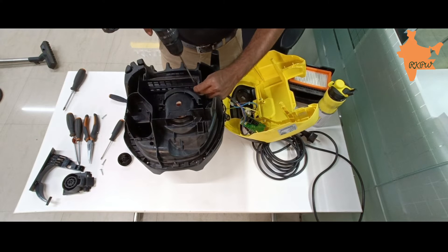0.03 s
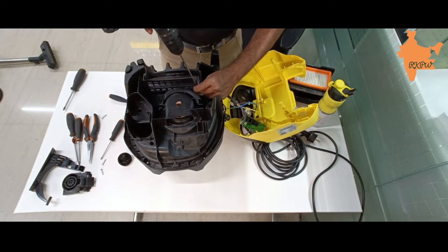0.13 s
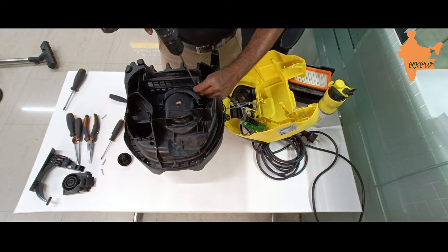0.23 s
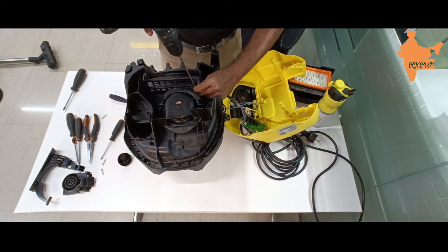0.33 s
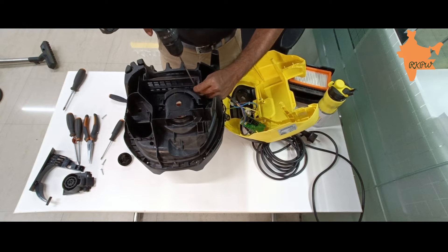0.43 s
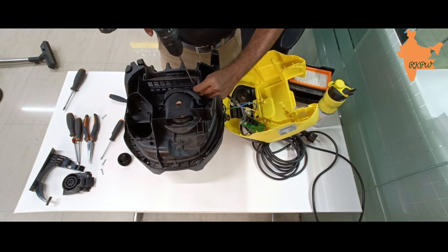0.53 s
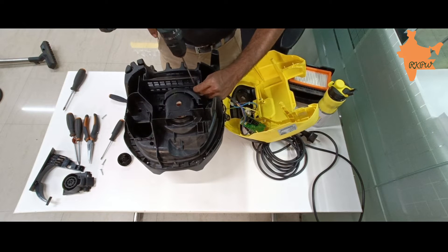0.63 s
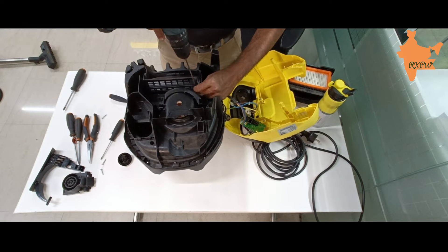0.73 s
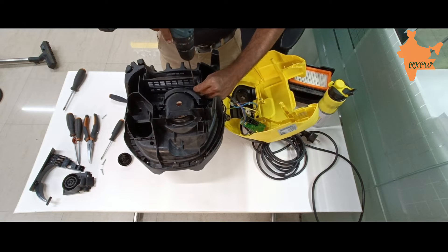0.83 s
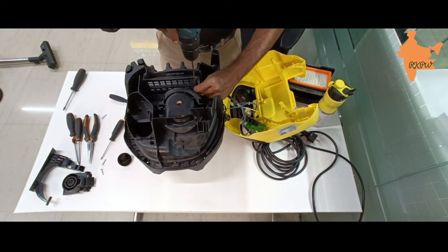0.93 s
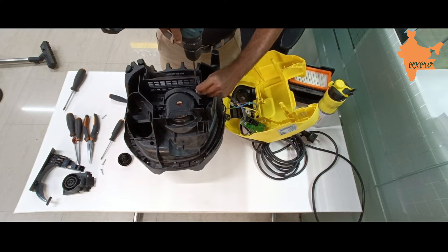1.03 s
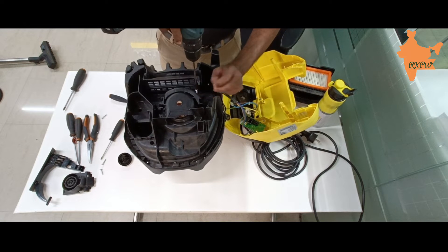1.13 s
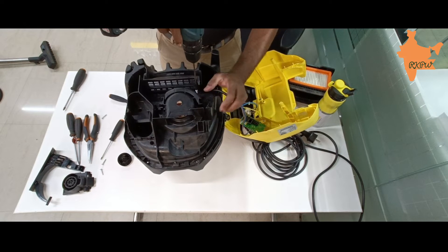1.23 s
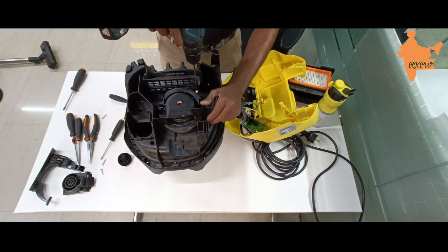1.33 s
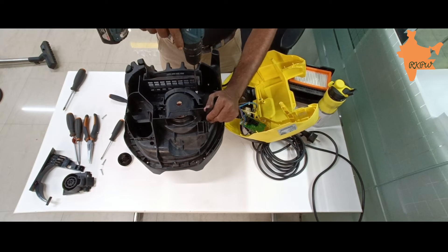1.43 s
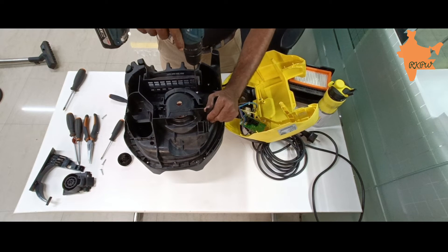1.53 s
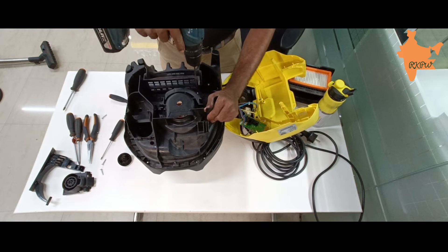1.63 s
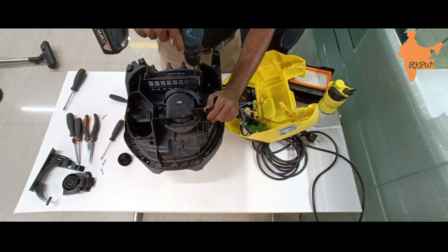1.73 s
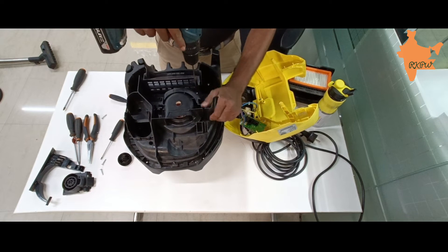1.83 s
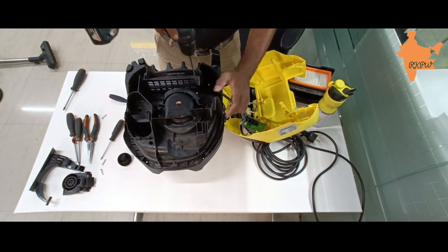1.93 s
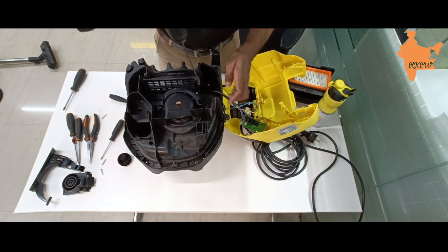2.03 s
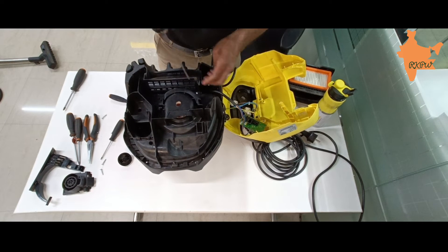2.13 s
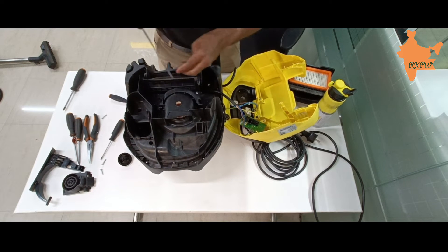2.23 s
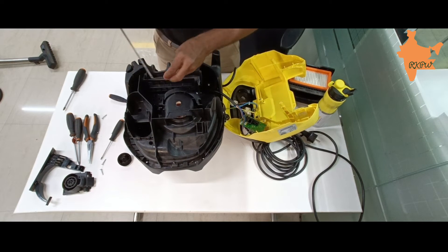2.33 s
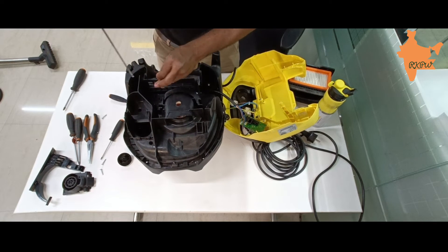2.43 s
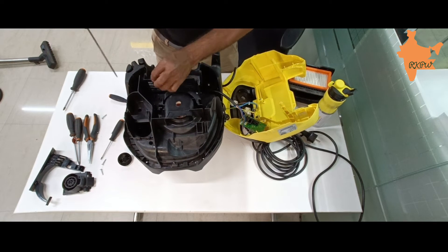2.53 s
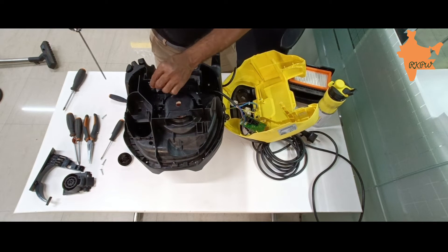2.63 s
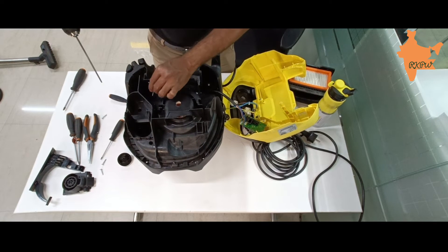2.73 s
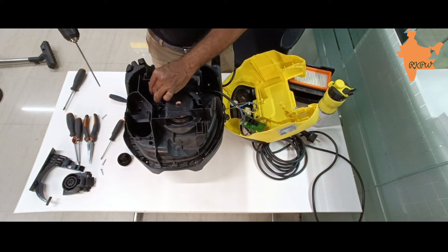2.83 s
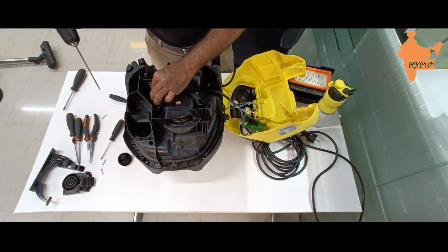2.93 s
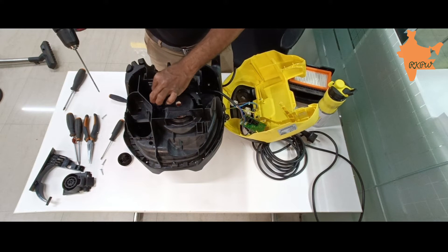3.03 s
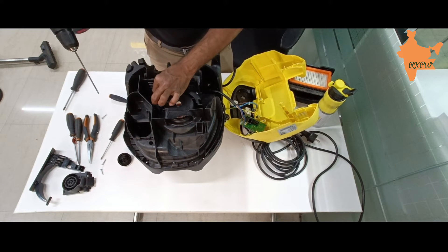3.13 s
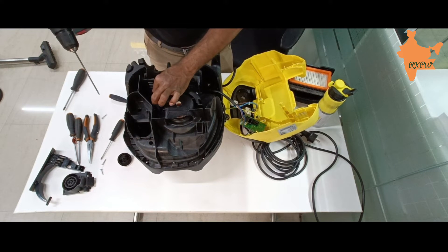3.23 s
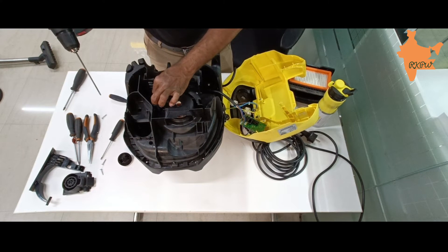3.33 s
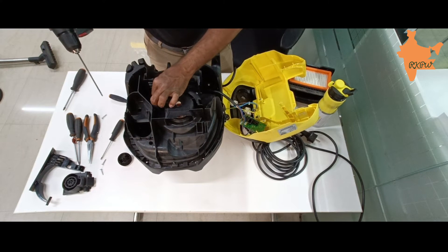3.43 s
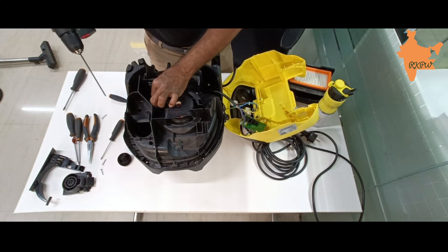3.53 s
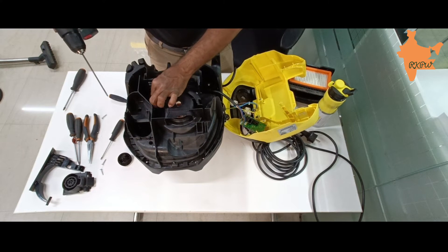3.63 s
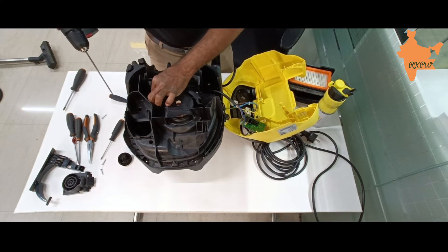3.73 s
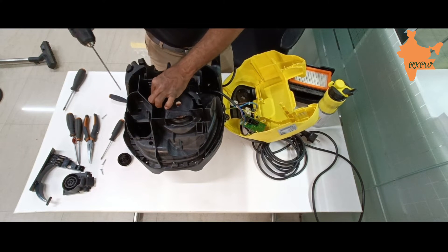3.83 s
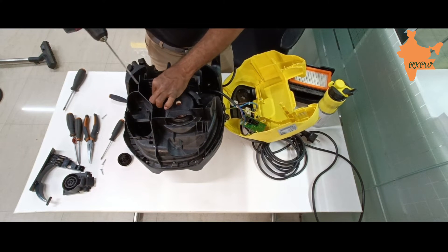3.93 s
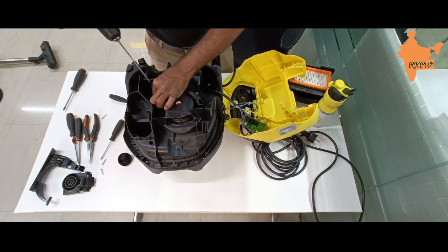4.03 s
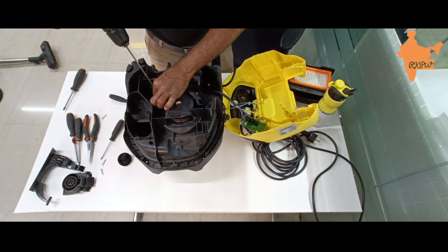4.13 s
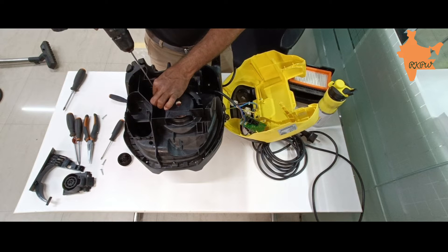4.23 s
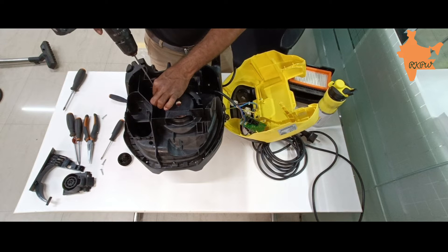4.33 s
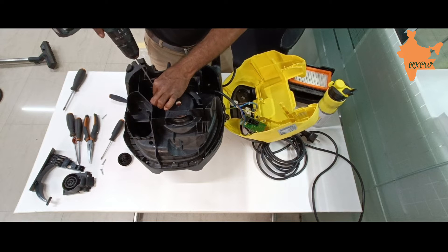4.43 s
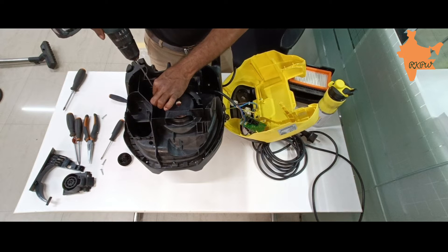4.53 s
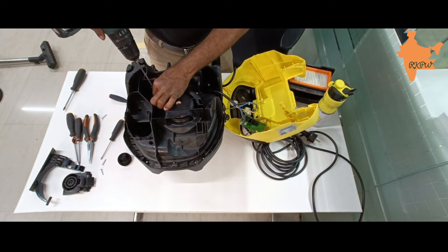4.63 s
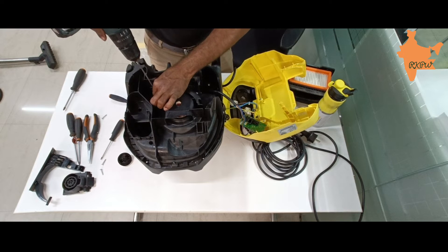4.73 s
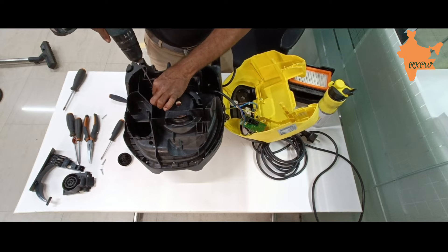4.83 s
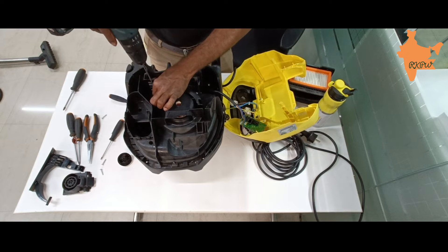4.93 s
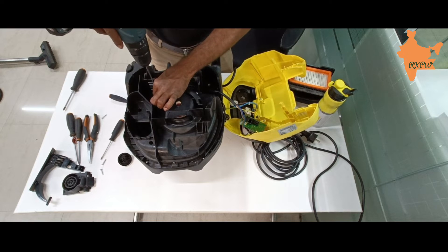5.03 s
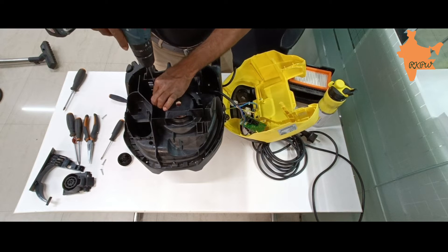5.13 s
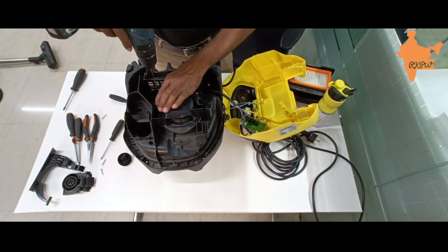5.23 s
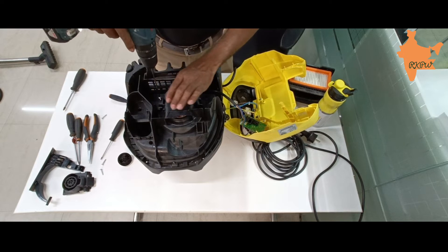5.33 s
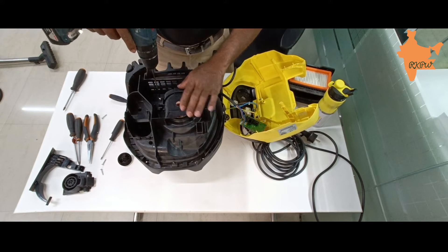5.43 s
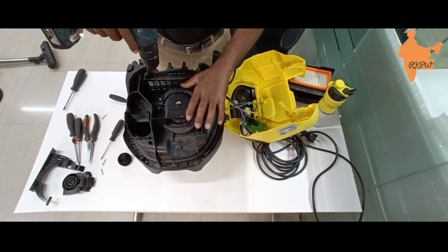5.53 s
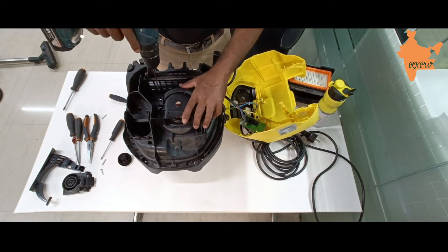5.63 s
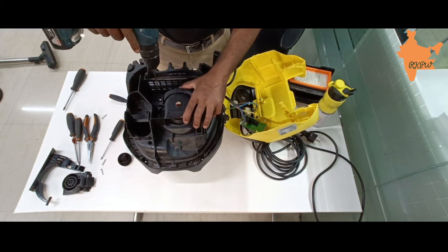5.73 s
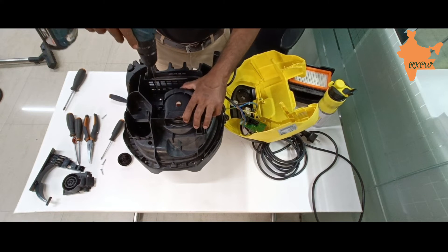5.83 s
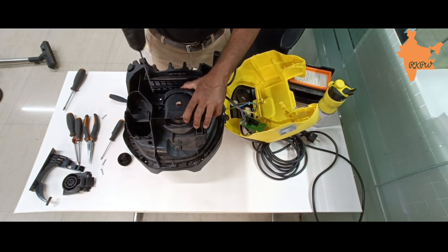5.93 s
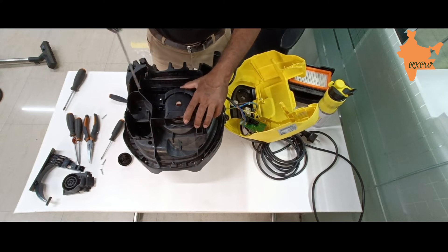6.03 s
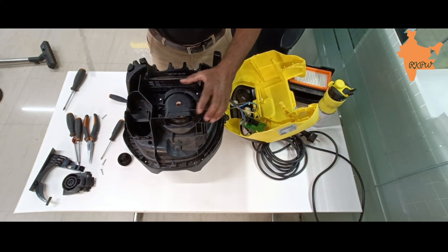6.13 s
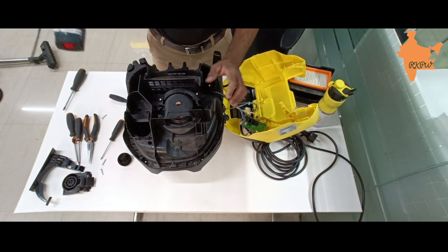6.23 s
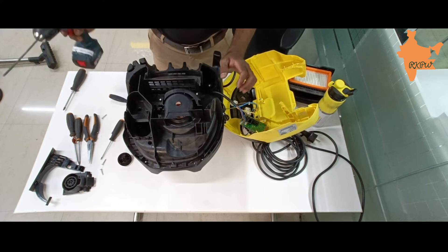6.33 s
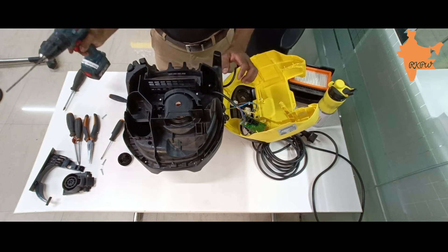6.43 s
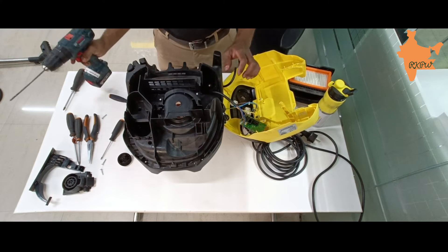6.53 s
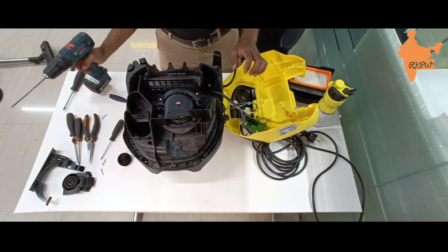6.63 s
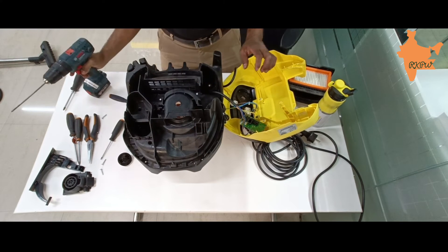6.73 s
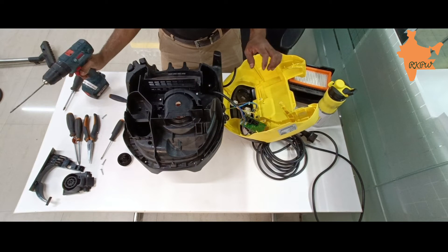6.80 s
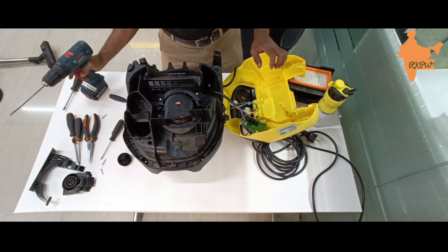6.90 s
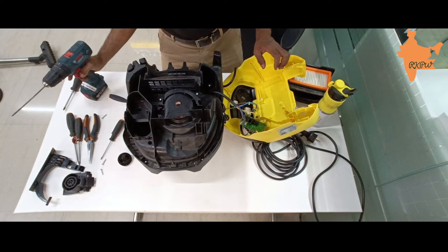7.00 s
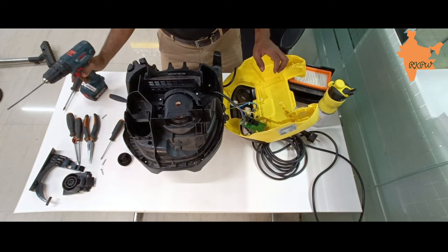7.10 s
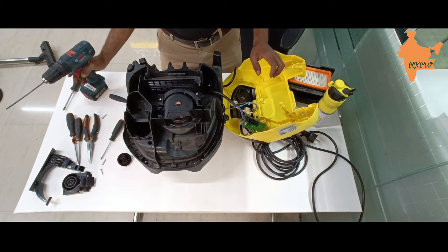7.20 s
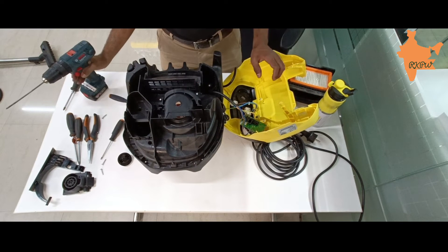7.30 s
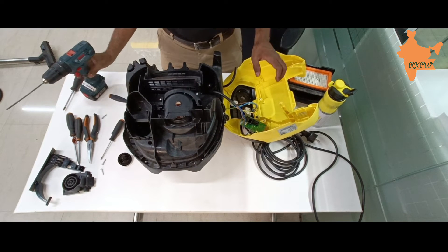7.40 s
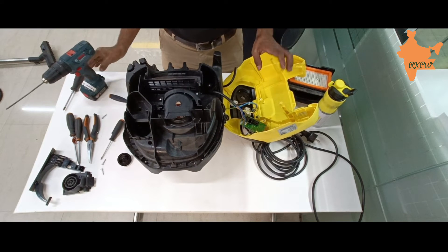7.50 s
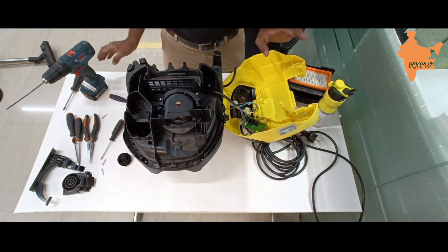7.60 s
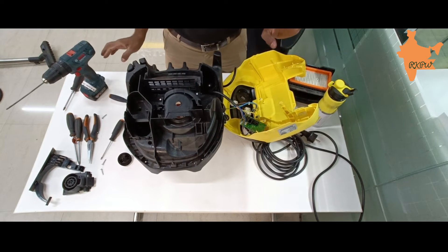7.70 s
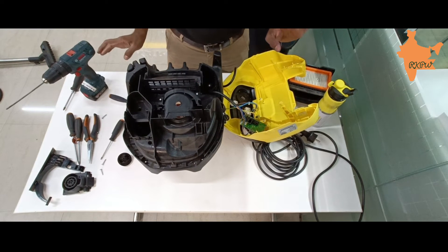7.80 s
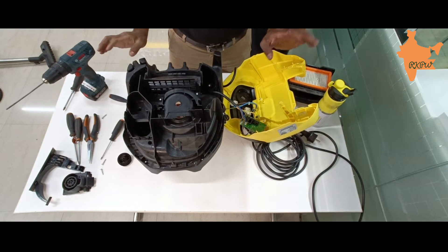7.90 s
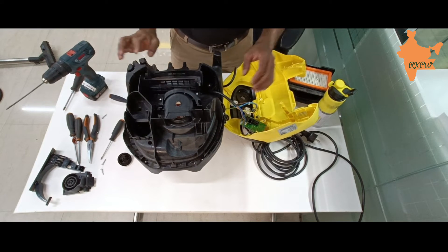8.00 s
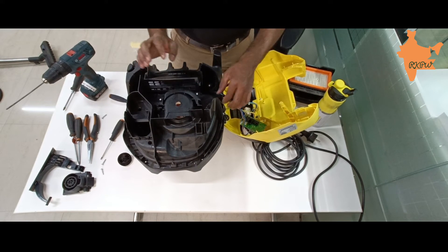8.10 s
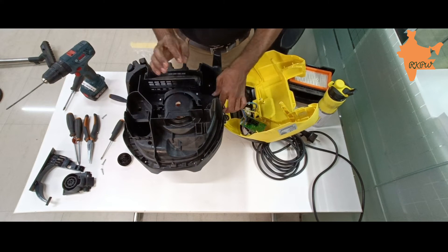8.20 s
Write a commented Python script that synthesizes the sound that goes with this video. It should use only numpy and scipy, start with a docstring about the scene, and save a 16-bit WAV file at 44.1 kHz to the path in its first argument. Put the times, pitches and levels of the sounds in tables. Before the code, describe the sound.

A cordless drill whines in two short bursts ending in clutch rattle, a small hard part bounces between them, then knocks on table and plastic.

```python
"""A cordless drill drives two screws into a plastic housing on a table in a hard-walled workshop.
Rotor and gear lines over brush hiss whine up with the trigger; noise snaps make the slipping clutch's rattle.
Between the runs a small hard part bounces to rest (noise cracks and modes) and a screw clinks.
Later the drill is stood on the table and the housing is knocked (filtered modes and cracks).
Machines hum far off: coloured noise and wavering sines."""
import sys
import numpy as np
from scipy import signal
from scipy.fft import rfft, irfft
from scipy.io import wavfile
from scipy.ndimage import uniform_filter1d, map_coordinates

SR = 44100
rng = np.random.default_rng(int(sys.argv[2]) if len(sys.argv) > 2 else 0)


def put_to_file(sound):
    """Save the sound as 16-bit audio at rate SR, in the file named by the first command-line argument."""
    columns = np.atleast_2d(sound).T  # one column per channel
    safe = np.clip(columns, -1, 1)
    whole_steps = np.round(safe * 32767)
    wavfile.write(sys.argv[1], SR, whole_steps.astype(np.int16))


N = 364266
T = np.arange(N) / SR  # s

# Levels in tables are relative: the functions add each source's own gain.
# rotor speed demand, last row lets go: t/s, f/Hz
RUN_1_SPEED = [(.722, 20), (.8, 125), (.9, 185), (.96, 197), (1.1, 199), (1.215, 195), (1.255, 232),
               (1.3, 325), (1.36, 418), (1.425, 466), (1.48, 380), (1.582, 365)]
RUN_2_SPEED = [(4.812, 20), (4.895, 205), (4.94, 270), (5.005, 305), (5.1, 307), (5.2, 295), (5.34, 304),
               (5.42, 340), (5.555, 345)]
# whine lines: multiple of rotor speed, level/dB
ROTOR_LINES = [(3.92, -24), (16, -7)]
GEAR_LINES = [(1.91, -28), (5.7, -22), (8.23, -10), (16.46, -17), (24.69, -25)]
# brush hiss colour, gearbox and shell: f/Hz, level/dB
GEARBOX_COLOUR = [(200, -12), (500, -16), (850, -16.5), (1200, -12), (1700, -14.5), (2400, -12.5),
                  (3500, -6.5), (5400, -10.5), (6700, -5), (8500, -16), (11000, -16), (14000, -20.5),
                  (15500, -36.5)]
SHELL_HZ, SHELL_WIDTH_HZ, SHELL_DB = 6680, 1500, -4
# the bit presses the whine into the housing, which sings along at one pitch
SING_HZ, SING_WIDTH_HZ, SING_DB = 585, 70, 9
# rotor inertia rounds speed changes; let go, it coasts down
INERTIA_S, COAST_S = .025, .085
# teeth rattle in their play while the speed changes: relative pitch jitter per Hz/s
BACKLASH_S_PER_HZ = 1.3e-5
# louder with speed; level change while the clutch slips
DB_PER_OCTAVE, STRAIN_DB = 8.5, -0.36
# clutch slips, screw home: start/s, end/s, first level/dB, last level/dB, slips per s, plastic ring f/Hz
CLUTCH_SLIPS = [(1.426, 1.59, -16.5, -23, 135, 341), (5.415, 5.586, -9.5, -24.5, 130, 473.4)]
# clutch rattle colour: f/Hz, level/dB
RATCHET_COLOUR = [(59, -43.5), (100, -13), (416, -12.5), (462, 1), (502, -21), (764, -8.5), (942, -19.5),
                  (1370, -7.5), (1770, -11), (2270, -12), (2470, -19), (6480, -12), (9260, -27.5),
                  (13000, -18.5), (15000, -28.5)]
# bit ringing under the rattle: f/Hz, level/dB, t60/s
BIT_MODE = (1358, 0, 0.2)
# drill lurches as the screw seats: t/s, level/dB, f/Hz
LURCHES = [(1.431, -14, 48), (1.466, -16, 85), (1.483, -12, 128.5), (5.388, -23, 70), (5.474, -21.5, 128)]

# falling part, tumbling from edge to edge: t/s, level/dB
BOUNCES = [(1.8695, -14.5), (1.873, -11), (1.9233, -15), (2.0487, -15), (2.0966, -14.5), (2.149, -17),
           (2.225, -20), (2.2703, -10), (2.3505, -17), (2.3705, -13), (2.3755, -17), (2.4362, -20),
           (2.4584, -13.5), (2.4928, -22), (2.5317, -16.5), (2.547, -20), (2.588, -17.5), (2.605, -21.5),
           (2.6255, -22), (2.654, -20.5), (2.662, -20.5), (2.699, -22), (2.7285, -22.5), (2.7382, -28),
           (2.7485, -27)]
# its crack colour: f/Hz, level/dB
PART_COLOUR = [(700, -13.5), (1100, -11), (1400, -4.5), (1900, 0), (3000, 2.5), (4500, 4), (5600, -1.5),
               (6500, 3.5), (8000, -1.5), (9300, -18.5), (10700, -12), (12500, -29.5), (15000, -39)]
# its ring: f/Hz, level/dB, t60/s
PART_MODES = [(1092, -2.5, .025), (1844, -4, .015), (3330, 0, .012), (4230, 2, .012), (5160, 5, .008),
              (6180, 7, .012)]
# its rim chatter: start/s, peak/s, end/s, level/dB
SETTLING = [(1.87, 1.93, 2.25, -39), (2.25, 2.62, 2.93, -35.5)]
# its wobble: first contact, level, first gap; gap ratio and level loss per contact
WOBBLE_S, WOBBLE_DB, WOBBLE_GAP_S, WOBBLE_KEEP, WOBBLE_LOSS_DB = 2.77, -24, .02, .88, 1.3

# screw set in its hole: t/s, level/dB, contact cut-off f/Hz
CLINKS = [(3.166, -37, 1380), (3.287, -25.5, 2150), (3.312, -30, 4530), (3.446, -23, 2970),
          (3.49, -27, 1900), (3.542, -23.5, 8900), (3.551, -19.5, 6300)]
# screw ring: f/Hz, level/dB, longest t60/s
CLINK_MODES = [(1383, 3, .02), (2090, -3, .015), (2525, -23, .25), (3300, -18, .22), (3601, -15, .3),
               (5728, -23, .25)]
# screw crack colour: f/Hz, level/dB
CLINK_COLOUR = [(400, -6), (800, -14), (1050, -4), (1450, -3.5), (2100, 1), (3000, -2), (5200, -0.5),
                (7000, -2), (9000, -13), (12000, -15), (15000, -26)]
# bit, screws and trigger on plastic: t/s, level/dB, relative treble level/dB
TICKS = [(0.094, -43.5, -5.5), (0.229, -62, 3.5), (0.558, -47, -4), (0.7567, -54, 2), (1.147, -25.5, -2),
         (1.6145, -30.5, -5), (4.816, -44.5, 6.5), (4.8375, -26, -5.5), (8.1583, -35.5, -18)]
# tick colour: f/Hz, level/dB
TICK_COLOUR = [(450, -4.5), (900, -9), (1350, -0.5), (2000, -6), (3500, -13), (5000, -13.5), (7000, -6.5),
               (9000, -25.5), (15000, -33)]
TICK_T60_S = 0.1

# blows on the housing: t/s, level/dB, contact cut-off f/Hz
HOUSING_BLOWS = [(.565, -29, 470), (.582, -26, 241), (.606, -26, 198.8), (1.143, -33.5, 1503),
                 (3.545, -30, 805), (4.704, -33, 860), (4.753, -22, 180), (5.385, -4, 654),
                 (5.428, -17, 1000), (5.603, -21, 553), (8.082, -21, 1640), (8.121, -26, 450),
                 (8.172, -31.5, 1200), (8.255, -26.5, 2010)]
# housing ring: f/Hz, level/dB, t60/s
HOUSING_MODES = [(244.7, -17, 0.4), (285.6, -7.5, 0.23), (345, 4, 0.05), (463, -5, 0.085),
                 (585.4, 0.5, 0.0695), (790, -4, 0.031), (1056, -6, 0.068), (1310, -25, 0.2),
                 (2554, -21.5, 0.084)]
# housing crack colour: f/Hz, level/dB
HOUSING_CRACK = [(200, -16), (500, -3), (1000, -4.5), (1700, -6), (3000, -7), (7000, 2.5), (15000, -23.5)]
# drill stood on the table: t/s, level/dB, contact cut-off f/Hz
TABLE_KNOCKS = [(6.556, -16, 4300), (6.678, -11.5, 5900), (6.693, -21, 2300), (6.723, -20.5, 3020),
                (6.744, -42, 2500), (6.869, -22, 3360), (6.869, -13.5, 317)]
# table ring: f/Hz, level/dB, t60/s
TABLE_MODES = [(49.1, -14, 1), (105, -16, 0.37), (127.5, -14.5, 0.59), (180, -10.5, 0.43),
               (289.8, -6.5, 0.33), (335, -3.5, 0.12), (399.8, -1.5, 0.24), (475, -9, 0.073),
               (704, -29, 0.21)]
# table crack colour: f/Hz, level/dB
TABLE_CRACK = [(200, -8), (600, 5), (930, -13.5), (1300, -3), (2200, -6), (4000, -16), (7000, -13),
               (15000, -31)]
# chuck and battery clicking in their seats: t/s, level/dB
JOLTS = [(6.5546, -31), (6.561, -48), (6.592, -45), (6.613, -54), (6.676, -25), (6.739, -28.5),
         (6.8687, -35.5), (7.951, -28)]
# their rattle while the drill rocks: start/s, peak/s, end/s, level/dB
ROCKING = [(6.56, 6.66, 6.8, -49)]
# their colour: f/Hz, level/dB
LOOSE_COLOUR = [(600, -10), (950, -10), (1400, 5), (2300, 2.5), (4000, 6), (5000, -2), (7000, 1),
                (9000, -39), (12000, -22), (15000, -34)]
# open cover shaking after a knock: start/s, peak/s, end/s, level/dB
COVER_SHAKE = [(8.082, 8.095, 8.24, -35)]
# cover colour: f/Hz, level/dB
COVER_COLOUR = [(300, 1), (480, -2), (620, -7), (1000, -6), (1400, 4), (2000, -5), (2500, -24), (5000, -30),
                (15000, -62)]
# hands and sleeves on plastic; aim lies past the end, so each only rises: start/s, aim/s, end/s, level/dB
RUSTLE = [(3.5, 5.3, 4.5, -53), (8.0, 11, 9.2, -23)]

# workshop air colour: f/Hz, level/dB
AIR_COLOUR = [(41, -19.5), (70, -5.5), (157, -10.5), (192, -6.5), (220, -12.5), (337, -10.5), (441, -20.5),
              (472, -20), (505, -16), (692, -16.5), (791, -22), (1590, -32), (6680, -37.5), (15000, -64.5)]
AIR_DB = -50.5
# the deep rumble's level rises and sinks, low just after each run: start/s, peak/s, end/s, level/dB
RUMBLE = [(-.3, 1.3, 1.72, -41.5), (2.1, 4.8, 5.58, -40.5), (6.1, 6.5, 8.7, -43)]
RUMBLE_REST_DB = -65.5  # always present beneath the swells
# steady hums: f/Hz, level/dB
HUMS = [(193.8, -57), (420, -67.5), (474, -69)]
# low drone swells: start/s, peak/s, end/s, level/dB
DRONE = [(2.05, 2.5, 4.25, -42.5)]
DRONE_HZ = 92.4
# far-off whistles: start/s, end/s, f/Hz, level/dB
WHISTLES = [(0, .09, 4190, -58), (4.6, 4.8, 3570, -73), (6.15, 6.48, 3320, -71.5)]
# room decay: f/Hz, t60/s
ROOM_T60 = [(100, 0.11), (500, 0.63), (2800, 0.81), (6000, 0.7), (9000, 0.63), (14000, 0.33)]
# hands keep moving: turnovers per s of the near-reflection pattern
SHIFT_PER_S = 1.0
TOP_HZ = 15500


def motor(run, level_db, hiss_db, treble_db, rotor_db, gear_db, fan_db):
    """Rotor, gear and fan lines track the speed; brushes scratch twice a turn. Gives (hiss, whine)."""
    hz = spin(run)
    age = T - run[0][0]
    release = fade(np.maximum(T - run[-1][0], 0), 0.048)
    trigger = np.clip(age / 0.086, 0, 1) ** 2 * release

    speed_jitter = .003 * (hz / 300) ** 2 * walk(120)
    backlash = BACKLASH_S_PER_HZ * np.abs(np.gradient(hz, T)) * walk(400)
    turn = 2 * np.pi * np.cumsum(hz * (1 + speed_jitter + backlash)) / SR

    # rotor sings once up to speed; teeth come in over 0.24 s
    rotor = amp(rotor_db) * np.clip((hz - 170) / 25, 0, 1) * lines(ROTOR_LINES, turn)
    gears = amp(gear_db) * np.clip(age / .24, 0, 1) ** 4 * lines(GEAR_LINES, turn)
    # fan blades chop the air: rough band round the main whine
    fan = amp(fan_db) * (hz / 450) * walk(700) * np.sin(15.7 * turn)

    # the jerking shaft holds no clean tone while the clutch slips, and for 0.2 s after
    slipping = sum(1. * (T > start) * (T < end + .2) for start, end, *_ in CLUTCH_SLIPS)
    slipping = uniform_filter1d(slipping, SR // 50)
    whine = (1 - .85 * slipping) * (rotor + gears + fan)
    whine = whine + amp(SING_DB) * resonate(whine, SING_HZ, SING_WIDTH_HZ)

    scratch = rng.standard_normal(N) * np.exp(0.24 * np.sin(2 * turn)) * amp(walk(120))
    scratch = brighten(colour(scratch, GEARBOX_COLOUR), treble_db, 2800)
    hiss = amp(hiss_db) * unit(scratch)
    hiss = hiss + amp(SHELL_DB) * resonate(hiss, SHELL_HZ, SHELL_WIDTH_HZ)

    db = level_db + DB_PER_OCTAVE * np.log2(hz / 300) + STRAIN_DB * slipping
    return trigger * amp(db) * np.array([hiss, np.sqrt(2) * whine])


def spin(run):
    """Rotor speed in Hz: demand with a coast-down, its changes rounded by a moving average as inertia."""
    s, hz = np.transpose(run)
    coast = np.exp(-(np.maximum(T - s[-1], 0) / COAST_S) ** 2)
    demand = np.interp(T, s, hz) * coast
    return np.maximum(uniform_filter1d(demand, int(INERTIA_S * SR)), 1)


def lines(table, turn):
    """Sines on multiples of the rotor angle, each flickering a little in level."""
    return sum(amp(db) * (1 + .12 * walk(70)) * np.sin(k * turn) for k, db in table)


def clutch(snap_t60_s=0.018, scatter_db=2.0, rattle_db=5, ring_db=-11, plastic_t60_s=0.33):
    """Balls jump the clutch ramps unevenly: noise snaps ring bit and plastic; lurches thump the table."""
    force, rings = np.zeros((2, 2, N))
    snap = fade(T[:SR // 10], snap_t60_s)
    for start, end, first_db, last_db, rate, plastic_hz in CLUTCH_SLIPS:
        body = ring([(plastic_hz, 0, plastic_t60_s), BIT_MODE])
        for s in np.arange(start, end, 1 / rate):
            late, size = rng.standard_normal(2)
            db = np.interp(s, [start, end], [first_db, last_db]) + scatter_db * size
            slip_s = s + .15 * late / rate
            add(force, slip_s, amp(db) * snap)
            add(rings, slip_s, amp(db + ring_db) * body)
    rattle = force * unit(colour(rng.standard_normal(N), RATCHET_COLOUR))
    out = rings + amp(rattle_db) * rattle
    for s, db, hz in LURCHES:
        thud = burst([(40, 0.0), (180, 4.5), (400, -11.5), (2000, -54.5)], 0.097)
        add(out, s, amp(db) * (ring([(hz, 0, .07)]) + .5 * thud))
    return out


def falling_part(crack_db=2, ring_db=-6, snap_db=-10, skid_db=-11, rebound_db=-9,
                 crack_t60_s=.014, skid_t60_s=0.037, chatter_per_s=260, pan_db=-3):
    """A hard part tumbles, wobbles ever faster and lower, and chatters on its rim: cracks and modes."""
    out = np.zeros((2, N))
    for s, db in list(BOUNCES) + wobble(count=11):
        snap = burst([(3000, 5), (9000, 15), (12500, -9), (15000, -8)], 0.0042)
        hit = amp(snap_db) * snap
        hit = hit + amp(crack_db) * burst(PART_COLOUR, crack_t60_s)
        hit = hit + amp(ring_db) * ring(vary(PART_MODES))
        hit = hit + amp(skid_db) * burst(PART_COLOUR, skid_t60_s)
        add(out, s, amp(db) * hit, pan_db)
        # the other end slaps down a moment later
        slap = amp(db + rebound_db) * burst(PART_COLOUR, crack_t60_s)
        add(out, s + rng.uniform(.004, .007), slap, pan_db)
    rim = chatter(PART_COLOUR, chatter_per_s, t60=.008, scatter_db=11)
    return out + rim * swell(SETTLING)


def wobble(count):
    """Contacts (s, dB) of a part rocking to rest, each sooner and weaker than the last."""
    k = np.arange(count)
    gaps = WOBBLE_GAP_S * WOBBLE_KEEP ** k
    times = WOBBLE_S + np.cumsum(gaps) - gaps
    return list(zip(times, WOBBLE_DB - WOBBLE_LOSS_DB * k))


def vary(modes):
    """Each contact lands on another edge, which shifts the modes and weights them anew."""
    return [(hz * (1 + .1 * rng.standard_normal()), db + 3 * rng.standard_normal(), t60)
            for hz, db, t60 in modes]


def clinks(level_db=2, ring_db=-4, crack_t60_s=.04, grip_s_per_hz=3e-5):
    """A steel screw lands with a dry crack; fingers choke its ring unless the contact is hard."""
    out = np.zeros((2, N))
    for s, db, contact_hz in CLINKS:
        grip_t60_s = grip_s_per_hz * contact_hz
        modes = [(hz, mode_db, min(t60, grip_t60_s)) for hz, mode_db, t60 in CLINK_MODES]
        hit = burst(CLINK_COLOUR, crack_t60_s) + amp(ring_db) * ring(modes)
        add(out, s, amp(db + level_db) * lowpass(hit, contact_hz))
    return out


def ticks(level_db=3, bright_db=13):
    """Light, dry contacts of metal and plastic: treble-shelved noise bursts."""
    out = np.zeros((2, N))
    for s, db, treble_db in TICKS:
        tick = brighten(burst(TICK_COLOUR, TICK_T60_S), treble_db + bright_db, 7460)
        add(out, s, amp(db + level_db) * tick)
    return out


def struck(blows, modes, crack, crack_t60_s, level_db, crack_db, crack_db_per_octave):
    """Blows ring and crack a body; a soft contact loses treble, a hard one hardly moves the low modes."""
    out = np.zeros((2, N))
    for s, db, contact_hz in blows:
        hardness_octaves = np.log2(contact_hz / 1000)
        crack_gain = amp(crack_db + crack_db_per_octave * hardness_octaves)
        hit = lowpass(ring(modes) + crack_gain * burst(crack, crack_t60_s), contact_hz)
        hit = hit - lowpass(hit, contact_hz / 14, order=1)
        add(out, s, amp(db + level_db) * hit)
    return out


def loose_parts(click_t60_s=0.024):
    """Chuck and battery click as the drill lands and is let go, and rattle as it rocks: noise bursts."""
    out = np.zeros((2, N))
    for s, db in JOLTS:
        add(out, s, amp(db) * burst(LOOSE_COLOUR, click_t60_s))
    return out + chatter(LOOSE_COLOUR, 90, click_t60_s, scatter_db=7) * swell(ROCKING)


def cover():
    """The loose plastic cover clatters briefly against the table: equal small contacts."""
    return swell(COVER_SHAKE) * chatter(COVER_COLOUR, 166, 0.053, scatter_db=0)


def rustle():
    """Skin and cloth catch and slide over plastic in small separate ticks."""
    return swell(RUSTLE) * chatter(TICK_COLOUR, 120, 0.025, scatter_db=5)


def background():
    """Ventilation rumble and hiss as diffuse noise; hums, a drone and thin whistles as wavering sines."""
    air = amp(AIR_DB + 0.13 * walk(3.2)) * pair(AIR_COLOUR, 900)
    rumble = pair([(25, -20.5), (46, 2.5), (60, -7.0), (85, -10.0), (140, -27.0), (600, -63.5)], 880)
    air = air + (amp(RUMBLE_REST_DB) + swell(RUMBLE)) * rumble
    tones = sum(amp(db + 2 * walk(1)) * sine(hz + 1.253 * walk(6.0)) for hz, db in HUMS)
    tones = tones + swell(DRONE) * sine(DRONE_HZ + 0.82 * walk(4.45))
    for start, end, hz, db in WHISTLES:
        gate = np.clip(np.minimum(T - start, end - T) / .06 + .5, 0, 1)
        tones = tones + amp(db) * gate * sine(hz + 25 * walk(270))
    return air + np.sqrt(2) * tones


def room(x, early_db, tail_db, lag_ms, early_t60_s):
    """Sound reaches two ports lag_ms apart; near scatter shifts its pattern, the walls ring on."""
    t = T[:SR]
    noise = pair([(30, 0), (15000, 0)], 800)
    # tail: noise decaying at its own rate in each band
    hz, frames, cells = signal.stft(noise[:, :SR], SR, nperseg=256)
    decay = fade(frames, by_hz(ROOM_T60, hz)[:, None])
    tail = signal.istft(cells * decay, SR)[1][:, :SR]
    onset = np.clip((t - .006) / 0.0014, 0, 1)
    response = amp(tail_db) * unit(tail * onset) / np.sqrt(SR)
    response[0, 0] += 1
    response[1, int(lag_ms * SR / 1000)] += 1
    out = signal.fftconvolve(x, response, axes=1)[:, :N]
    # small things near by scatter only the short waves; four patterns take turns
    scatter = noise - lowpass(noise, 1100, order=1)
    for k in range(1, 5):
        early = scatter[:, k * SR:(k + 1) * SR] * fade(t, early_t60_s) * (t > .0003)
        early = amp(early_db) * unit(early) / np.sqrt(SR)
        share = np.cos(np.pi * (SHIFT_PER_S * T + k / 4)) / np.sqrt(2)
        out += signal.oaconvolve(x * share, early[:, :SR // 5], axes=1)[:, :N]
    return out / np.sqrt(1 + amp(early_db) ** 2 + amp(tail_db) ** 2)


def amp(db):
    """Decibels to gain."""
    return 10 ** (np.asarray(db) / 20)


def unit(x):
    """Scale to rms 1."""
    return x / np.sqrt(np.mean(x ** 2) + 1e-20)


def by_hz(points, hz):
    """Read (Hz, value) points on a log-frequency axis."""
    f, value = np.transpose(points)
    return np.interp(np.log(hz + 1), np.log(f), value)


def colour(x, points):
    """Minimum-phase filter with the given (Hz, dB) outline, falling away below its lowest point."""
    size = 8192
    hz = np.fft.rfftfreq(size, 1 / SR)
    gain = amp(by_hz(points, hz)) * np.clip(hz / points[0][0], .03, 1) ** 2
    # folding the cepstrum makes the response causal
    cepstrum = irfft(np.log(gain))
    cepstrum[1:size // 2] *= 2
    cepstrum[size // 2 + 1:] = 0
    response = irfft(np.exp(rfft(cepstrum)))
    return signal.fftconvolve(x, response)[:len(x)]


def lowpass(x, hz, order=2):
    """Butterworth low-pass."""
    return signal.sosfilt(signal.butter(order, min(hz, SR / 2 - 100), fs=SR, output="sos"), x)


def resonate(x, hz, width_hz):
    """One resonance, gain 1 at its centre."""
    return signal.lfilter(*signal.iirpeak(hz, hz / width_hz, fs=SR), x)


def brighten(x, db, hz):
    """Shelve the treble above hz."""
    low = lowpass(x, hz, order=1)
    return low + amp(db) * (x - low)


def walk(rate):
    """Random curve of rms 1: straight lines between rate random knots a second."""
    knots = rng.standard_normal(4096)
    return unit(map_coordinates(knots, [T * rate], order=1, mode="wrap"))


def sine(hz):
    """Sine of varying frequency, phase summed sample by sample."""
    return np.sin(2 * np.pi * np.cumsum(hz) / SR)


def fade(t, t60):
    """Exponential decay by 60 dB in t60 seconds."""
    return amp(-60 * t / np.maximum(t60, 1e-3))


def swell(rows):
    """Gain that rises and falls in straight lines once for each (start s, peak s, end s, dB)."""
    return sum(amp(db) * np.interp(T, [start, peak, end], [0, 1, 0]) for start, peak, end, db in rows)


def ring(modes):
    """Struck modes (Hz, dB, t60 s) as decaying sines, alternating in sign, peak 1."""
    t = T[:SR // 2]
    y = sum((-1) ** k * amp(db) * np.sin(2 * np.pi * hz * t) * fade(t, t60)
            for k, (hz, db, t60) in enumerate(modes))
    return y / np.abs(y).max()


def burst(points, t60):
    """A crack: coloured noise, set to rms 1 and then faded, for countless short-lived modes."""
    t = T[:SR // 2]
    return unit(colour(rng.standard_normal(len(t)), points)) * fade(t, t60)


def chatter(points, rate, t60, scatter_db):
    """Tiny random contacts of uneven strength, on average rate a second, as coloured noise of rms 1."""
    contacts = (rng.random(N) < rate / SR) * amp(scatter_db * rng.uniform(-0.45, 1, N))
    force = signal.fftconvolve(contacts, fade(T[:SR // 20], t60))[:N]
    return unit(colour(force * rng.standard_normal(N), points))


def pair(points, wide_hz):
    """Diffuse noise at two microphones: more alike in the bass than in the treble."""
    mid, side = (colour(rng.standard_normal(N), points) for _ in range(2))
    side = side - .5 * lowpass(side, wide_hz, order=1)
    return unit(mid + np.array([[1], [-1]]) * side)


def add(out, s, x, pan_db=0):
    """Mix a sound into both channels at time s; pan_db is first channel over second."""
    i = max(int(s * SR), 0)
    x = x[:max(N - i, 0)]
    out[:, i:i + len(x)] += amp(np.array([[pan_db], [-pan_db]]) / 2) * x


def scene():
    """Drill, small parts and knocks, each through the room, over the workshop background."""
    hiss_1, whine_1 = motor(RUN_1_SPEED, level_db=-26.0, hiss_db=2.0, treble_db=-0.5,
                            rotor_db=3.5, gear_db=-1, fan_db=-13)
    hiss_2, whine_2 = motor(RUN_2_SPEED, level_db=-23.0, hiss_db=-0.5, treble_db=1.5,
                            rotor_db=3, gear_db=-.5, fan_db=-4)
    drill = clutch()
    add(drill, 0, hiss_1, pan_db=-1.0)
    add(drill, 0, hiss_2, pan_db=-0.5)
    whine = np.array([whine_1 + whine_2] * 2)
    small = ticks() + clinks() + loose_parts() + cover() + rustle()
    housing = struck(HOUSING_BLOWS, HOUSING_MODES, HOUSING_CRACK, crack_t60_s=0.06,
                     level_db=9.0, crack_db=-4.0, crack_db_per_octave=12.5)
    table = struck(TABLE_KNOCKS, TABLE_MODES, TABLE_CRACK, crack_t60_s=0.16,
                   level_db=2.5, crack_db=-9, crack_db_per_octave=-1.08)
    # the whine arrives almost straight
    out = room(drill, early_db=0, tail_db=-0.5, lag_ms=.13, early_t60_s=.04)
    out = out + room(whine, early_db=-10, tail_db=-8, lag_ms=.08, early_t60_s=.02)
    out = out + room(falling_part(), early_db=0, tail_db=-3, lag_ms=.14, early_t60_s=.022)
    out = out + room(small, early_db=8, tail_db=-2.0, lag_ms=.12, early_t60_s=.03)
    out = out + room(housing, early_db=8.0, tail_db=-5.0, lag_ms=.1, early_t60_s=0.067)
    out = out + room(table, early_db=-1, tail_db=-4, lag_ms=.1, early_t60_s=.06)
    return out + background()


def record(dry):
    """The recorder cuts the top: steep elliptic low-pass."""
    return signal.sosfilt(signal.ellip(10, .2, 80, TOP_HZ, fs=SR, output="sos"), dry)


dry = scene()
out = record(dry)
put_to_file(out)
```